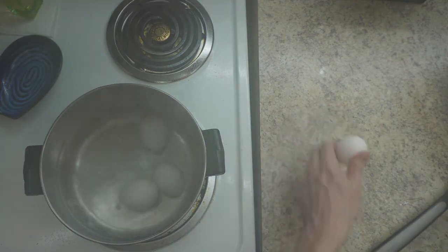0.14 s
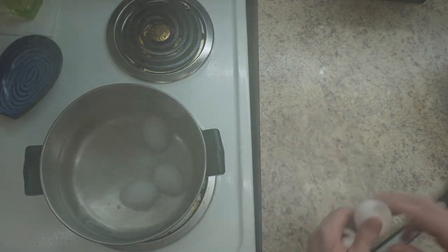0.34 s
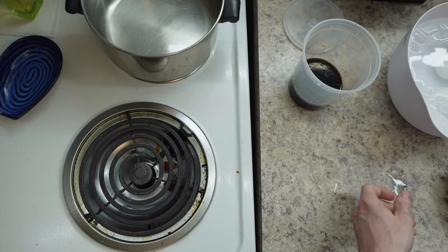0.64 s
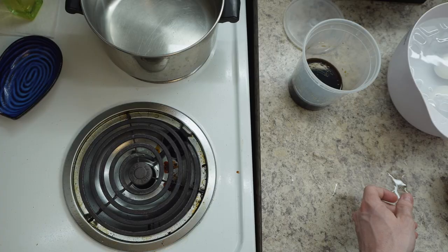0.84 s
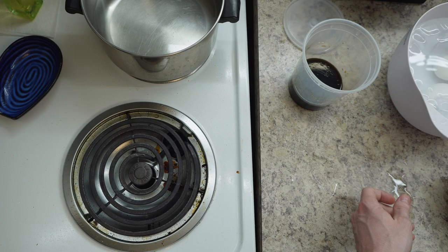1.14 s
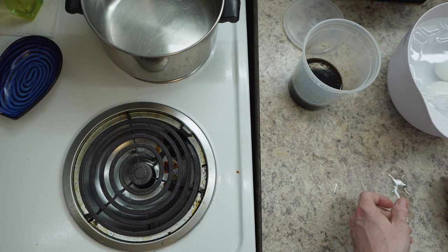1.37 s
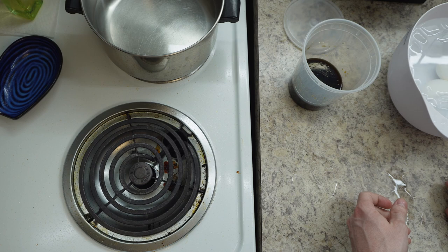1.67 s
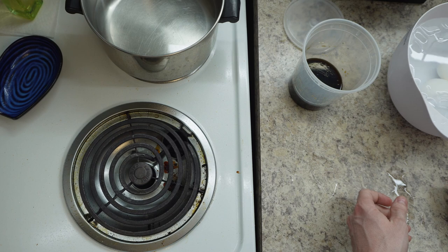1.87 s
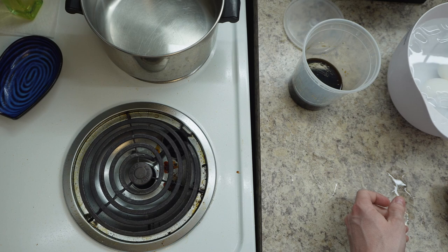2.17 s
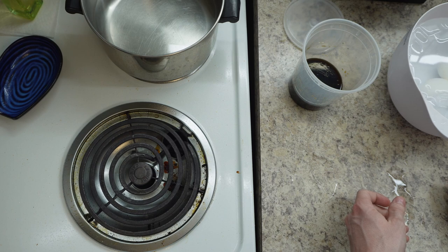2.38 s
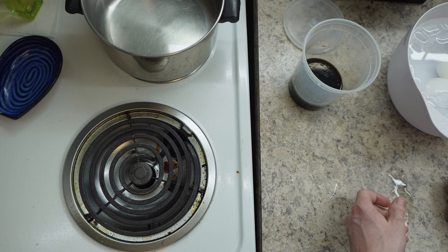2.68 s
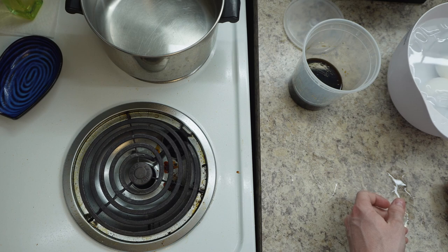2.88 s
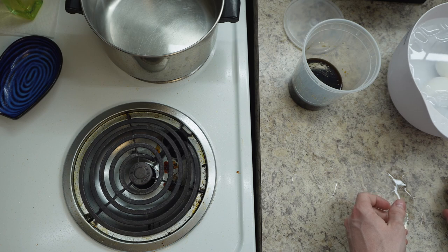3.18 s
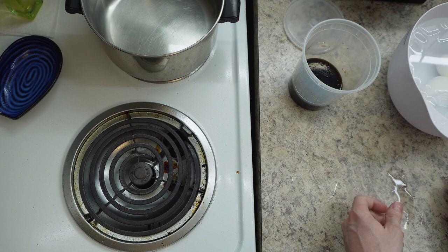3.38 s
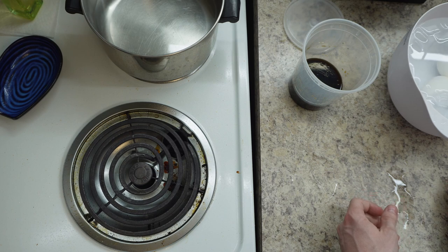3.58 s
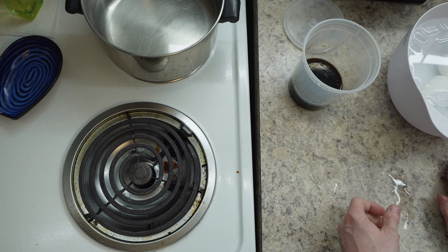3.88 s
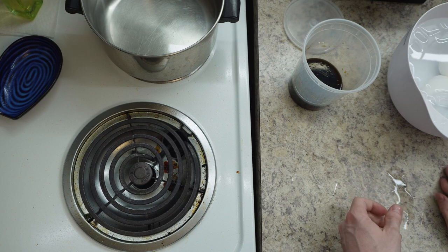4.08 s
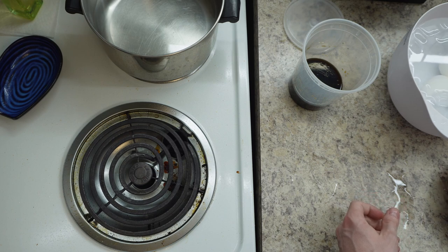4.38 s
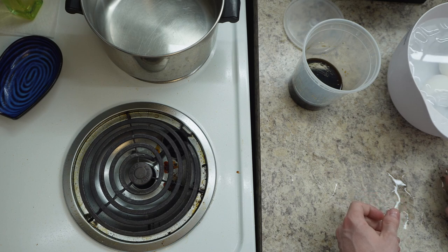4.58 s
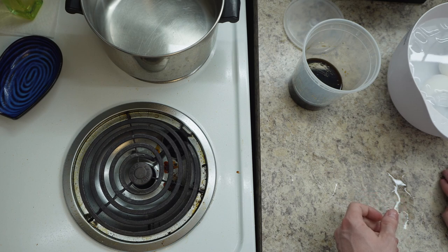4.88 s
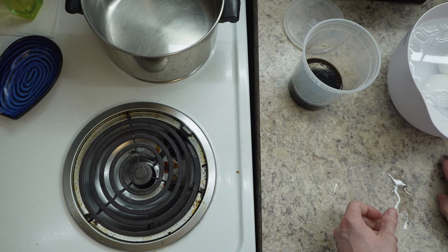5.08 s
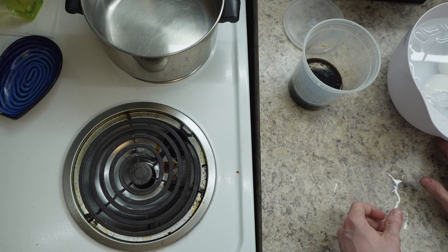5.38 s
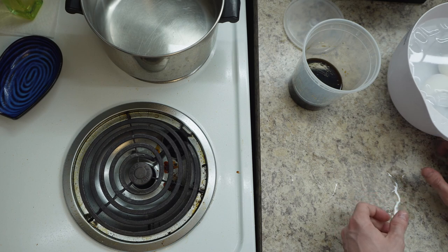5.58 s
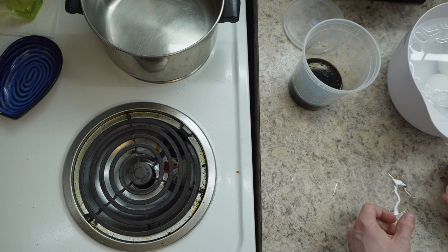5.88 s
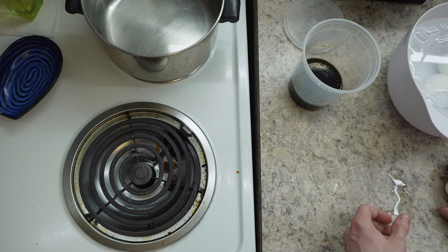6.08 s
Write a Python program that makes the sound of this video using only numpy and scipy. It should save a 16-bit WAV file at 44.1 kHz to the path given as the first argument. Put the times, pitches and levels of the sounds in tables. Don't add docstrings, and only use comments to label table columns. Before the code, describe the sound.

At the very start, an egg knocks the stone counter once, a soft click with a low woody ring and a small rumble, under sagging low room noise, a puff of steam hiss and a faint thin whistle. At about 0.65 seconds this cuts to quiet, steady fan hum. A blunt knock with a spray of splitting shell lands near 1.5, a very bright, short crack at 2.25, a softer knock that rings the stove at 2.7, and another crunchy tap at 2.9. From 3.15 to 3.5 the egg rolls, bumping and scraping grit, ending in a dry flick. Three quick taps follow at 4.5, 4.7 and 4.9, the last with a tiny rebound and flake tick. Faint ticks lead to a brief crackling squeeze around 5.5 to 5.7; then only fan air. The small hard room gives short, dense echoes to the close, dry blows.

```python
import sys
import numpy as np
from scipy import signal
from scipy.fft import rfft, irfft
from scipy.io import wavfile

SR = 44100
rng = np.random.default_rng(int(sys.argv[2]) if len(sys.argv) > 2 else 0)


def materialize(psi):
    bounded = np.clip(np.atleast_2d(psi).T, -1, 1)
    quanta = np.round(bounded * 32767).astype(np.int16)
    wavfile.write(sys.argv[1], SR, quanta)


def ratio(d):
    e = np.asarray(d, float) / 20
    return 10 ** e


N = 275003
TIME = np.arange(N) / SR


def first_knock():
    # (t/s, strength/dB, sharpness/(dB per octave above 1 kHz))
    hits = [
        (0.0255, 1, 2),
    ]
    # (f/Hz, level/dB, t60/s)
    modes = [(246, 3.5, 0.17), (324, -10, 0.34), (516, -1.5, 0.44), (804, -35, 1.0), (970, -14, 0.42),
             (1150, -4, 0.23), (1497, -38, 0.2), (2090, -17, 0.24), (2700, -12.5, 0.1), (400, 6.0, 0.075),
             (660, -18.0, 0.13), (202, 6.5, 0.28), (107, 2, 0.1), (1030, -4, 0.13)]
    # (f/Hz, level/dB)
    colour = [(300, -28.5), (600, -25), (1000, -29), (2700, -34.5), (4000, -46), (12000, -59.5)]
    return ratio(-6) * blows(hits, colour, modes, direct_db=-2, split_db=-9.5, split_s=0.0083)


def dull_knock():
    # (t/s, strength/dB, sharpness/(dB per octave above 1 kHz))
    hits = [
        (1.4676, 0, 0),
    ]
    # (f/Hz, level/dB, t60/s)
    modes = [(262.8, -2, 0.073), (405.0, 7, 0.092), (510, -1, 0.059), (687.0, -7.0, 0.3),
             (1250, -35, 0.176), (1460, -8, 1.0), (3090, -9, 0.04), (3460, -45, 0.026), (730, -1.5, .2),
             (570, -20, 0.084), (861, -1, .2), (862, -5.5, .15), (5900, -30, 0.024), (11100, 1, 0.035)]
    # (f/Hz, level/dB)
    colour = [(300, -17.5), (600, -12), (1100, -15), (3000, -16.5), (6000, -19.5), (7500, -32),
              (13000, -38)]
    return ratio(-1.5) * blows(hits, colour, modes, direct_db=8.5, split_db=-11.5, split_s=0.02)


def sharp_knock():
    # (t/s, strength/dB, sharpness/(dB per octave above 1 kHz))
    hits = [
        (2.2556, -1, 0.002),
    ]
    # (f/Hz, level/dB, t60/s)
    modes = [(292.7, 6.5, 0.27), (511, -8, 0.13), (662, -12.0, 0.1), (779.8, -4, 0.17),
             (1136.0, -3.5, 0.15), (1447, -2, 0.64), (1625, -1, 0.065), (3034, -3.5, 0.12),
             (3667, 6.5, 0.073), (380, -0.5, 0.16), (1014, -4.0, .2), (200, 2.5, 0.59), (121, -9.5, 0.31),
             (5850, 1.0, .1)]
    # (f/Hz, level/dB)
    colour = [(300, -29.5), (1000, -15.5), (3000, -19.5), (6000, -16), (12000, -33.5)]
    return ratio(-3) * blows(hits, colour, modes, direct_db=9.0, split_db=5.5, split_s=0.0022, give_s=0.00038)


def fourth_knock():
    # (t/s, strength/dB, sharpness/(dB per octave above 1 kHz))
    hits = [
        (2.6834, 0, 0.0049),
    ]
    # (f/Hz, level/dB, t60/s)
    modes = [(195, -5, 0.17), (357, -4, 0.4), (505, 0, 0.24), (537, 0.5, 0.36), (705, -15, 0.071),
             (1020, -19, 0.14), (1200, 3.0, 0.17), (2956, 3, 0.21), (3410, -20, 0.18), (3560, 2.5, 0.16),
             (400, 5, 0.11), (5370, 8.5, 0.032), (8770, 7, 0.035)]
    # (f/Hz, level/dB)
    colour = [(300, -23), (1000, -25), (3000, -31.5), (6000, -36.5), (12000, -54)]
    return ratio(-5) * blows(hits, colour, modes, direct_db=-4, split_db=-5, split_s=0.015, stove_db=2.0)


def last_taps():
    # (t/s, strength/dB, sharpness/(dB per octave above 1 kHz))
    hits = [
        (2.922, -2, 0.42),
        (4.4957, -1.5, 0.4),
        (4.692, -3.5, 1.8),
        (4.876, -2.7, 4.5),
        (4.884, -10, 3.5),
    ]
    # (f/Hz, level/dB, t60/s)
    modes = [(196.3, 6.5, 0.23), (322.0, 13.5, 0.045), (496, 4.5, 0.11), (801.0, 0, 0.3),
             (1040, 0.0, 0.077), (1195.3, 6, 0.05), (1537, -1.0, 0.043), (1748, 2.0, 0.045),
             (2083, -5.0, 0.19), (3335, -3.0, 0.055), (437, 9.5, 0.033), (400, 4.0, 0.12),
             (131.0, -2, 0.21), (5110, -7, 0.12)]
    # (f/Hz, level/dB)
    colour = [(300, -28.5), (1000, -24.5), (2100, -24.5), (3400, -26), (4500, -33.5), (6000, -32),
              (12000, -44.5)]
    return ratio(-0.5) * blows(hits, colour, modes, direct_db=7.0, split_db=-0.5, split_s=0.011, stove_db=9.5)


def blows(hits, colour, modes, direct_db, split_db, split_s, stove_db=-60, give_s=.0023):
    out = np.zeros((2, N))
    phases = np.pi + 1.03 * rng.standard_normal(len(modes))
    for s, strength_db, sharp_db in hits:
        body = 0
        for (hz, db, t60), phase in zip(modes, phases):
            level_miss, pitch_miss = rng.standard_normal(2)
            damped_t60 = min(t60 / 2, 36 / hz + .03)
            body = body + ratio(db + 2.5 * level_miss) * ring(hz * (1 + .006 * pitch_miss), damped_t60, phase)
        body += ratio(stove_db - 15) * ring(307, 0.401)
        age = np.arange(len(body)) / SR
        body *= 1 - np.exp(-age / .0012)

        far = body * np.exp(-age / .0007)
        split_sum = ratio(split_db) * np.sqrt(SR / (1 / split_s + 1 / .006))
        far[0] -= np.hypot(ratio(direct_db), split_sum)

        splitting = rng.laplace(size=len(body)) * np.exp(-age / split_s)
        body += ratio(split_db) * splitting * np.minimum(age / 0.00064, 1)
        body[0] -= ratio(direct_db - 4.5)
        body[int(give_s * SR)] -= ratio(direct_db)

        tone = []
        for hz, db in colour:
            octaves = max(np.log2(hz / 1000), 0)
            tone.append((hz, db + strength_db + sharp_db * octaves))
        bottom = [(20, tone[0][1] - 36), (70, tone[0][1] - 14)]
        contact = click(bottom + tone + [(16000, tone[-1][1] - 11)])
        add(out[0], s + .0017, signal.fftconvolve(body, contact))
        add(out[1], s + .0017, signal.fftconvolve(far, contact))
    return out


def squeeze():
    # (t/s, splinter level/dB, hollow level over it/dB)
    splits = [(5.52, -70, -9), (5.54, -68, 4), (5.5875, -57, -8), (5.5975, -49, -22), (5.6018, -42, 0),
              (5.612, -58, -7), (5.6225, -46.5, -24), (5.638, -45.5, -8), (5.646, -56, -16),
              (5.6631, -43.5, 0.5), (5.668, -58, 9)]
    out, t = np.zeros(N), TIME[:2000]
    for s, db, hollow_db in splits:
        burst = rng.laplace(size=len(t)) * np.exp(-t / 0.0047)
        hollow = ratio(hollow_db + 14.5) * band(band(burst, 840, 1200), 750, 1600)
        middle = ratio(9.0) * band(band(burst, 1640, 2020), 3300, 3100)
        splinters = ratio(2.0) * band(band(burst, 5300, 6600), 6400, 8000)
        add(out, s, ratio(db) * (hollow + middle + splinters))
    rustle = unit(band(grains(5000, 2.8), 6000, 8000))
    touch = swell(5.532, -62, rise_s=.023, fall_s=.077)
    full = swell(5.6, -50.5, rise_s=0.015, fall_s=0.042, hold_s=0.079)
    return out + ratio(-10) * (touch + full) * rustle


def roll():
    # (t of greatest pressure/s, rumble level/dB, grit level/dB, 20 dB rise/s, 20 dB fall/s)
    rocks = [
        (0.003, -39.5, -60, 0.054, 0.069),
        (0.028, -31.5, -60, 0.0093, 0.024),
        (1.744, -54, -81, .024, 0.077),
        (3.165, -62, -77, .05, .06),
        (3.23, -68, -68, .06, .06),
        (3.278, -61, -56.5, 0.028, 0.037),
        (3.418, -46.5, -59, 0.072, 0.028),
    ]
    # (t/s, level/dB, f/Hz, t60/s)
    bumps = [(1.744, -50, 260, 0.071), (2.262, -42, 202, 0.11), (2.69, -68, 150, 0.099),
             (4.7, -41, 200, 0.072), (4.885, -35.5, 200, 0.077), (2.27, -49.5, 76.5, 0.17),
             (3.153, -50, 430, .04), (3.165, -56, 400, 0.1), (3.225, -54.5, 380, 0.073),
             (3.273, -41, 385, 0.044), (3.287, -59.5, 377, 0.023), (3.404, -54, 790, 0.053),
             (3.408, -41, 318, 0.035), (3.422, -46, 365, 0.046), (3.433, -41, 400, 0.019),
             (3.465, -55, 300, 0.26), (3.481, -57, 325, 0.037), (4.7, -66, 70, 0.54)]
    rumble = unit(drum(grains(270, 2.0)))
    grit = grains(4000, 2.5)
    scrape = unit(band(band(grit, 3000, 5000), 4200, 6000) + 0.52 * band(grit, 5000, 500))
    rocking = np.zeros(N)
    for s, db, grit_db, rise_s, fall_s in rocks:
        rubbing = ratio(db - 7.0) * rumble + ratio(grit_db - 11) * scrape
        rocking += swell(s, 0, rise_s, fall_s) * rubbing
    return rocking + ratio(3.5) * pings(bumps, grit=0.13)


def drum(x):
    # (f/Hz, width/Hz, level/dB)
    modes = [(260, 61, 2.5), (384.7, 110, 3), (460, 240, -18), (743, 140, -7.5), (1305, 210, -13.5)]
    return sum(ratio(db) * band(band(x, hz, w), hz, 2 * w) for hz, w, db in modes)


def ticks():
    # (t/s, level/dB, f/Hz)
    flakes = [(.17, -64, 10200), (0.185, -63, 3540), (.236, -69, 4830), (.357, -66, 10500),
              (.44, -68, 5050), (0.899, -71, 3080), (1.061, -71, 8200), (1.902, -73, 9000),
              (3.781, -71.5, 6000), (4.21, -70, 8080), (4.832, -69, 13500), (4.946, -39, 6000),
              (5.123, -60, 8340), (5.297, -59, 3670)]
    # (t/s, level/dB, f/Hz, t60/s)
    snaps = [
        (.720, -53, 1490, 0.045),
        (.721, -60, 2900, .03),
        (1.060, -61, 1588, 0.04),
        (1.061, -58.5, 2700, .03),
        (1.4775, -41.5, 5900, 0.012),
        (1.830, -54, 1450, 0.045),
        (2.2577, -5.5, 5680, 0.0054),
    ]
    flick = ratio(-3.5) * (np.arange(N) == int(3.486 * SR))
    flick = band(band(flick, 10200, 1300) + ratio(-31) * flick, 11200, 5400)
    small = pings([(*row, 0.012) for row in flakes], grit=5)
    return flick + pings(snaps, grit=.05) + ratio(-6) * small


def kitchen(x, wet_db, far=None, early_db=-6, early_s=0.024, gap_s=0.0015):
    # (f/Hz, t60/s, level/dB)
    decay = [(150, 0.34, -6), (300, 0.15, -39), (595, 0.33, -5.5), (1180, 0.64, -20), (2600, 0.32, -19.5),
             (5030, 0.2, -34.5), (8700, 0.39, -20.5), (15000, 0.065, -15.5)]
    # (f/Hz, level/dB)
    wall_colour = [(300, 0.5), (1600, 3), (2400, -3), (3500, 0), (4500, -2), (6300, 3), (7000, 0),
                   (9000, 1)]
    t, noise = TIME[:SR], rng.standard_normal(SR)
    early = ratio(early_db) * np.exp(-t / early_s)
    tail = sum(ratio(db) * band(noise, hz, hz) * (1000. ** (-t / t60) + early) for hz, t60, db in decay)
    echo = np.convolve(tail * (t > gap_s), click(wall_colour, size=512))
    sent = x if far is None else far
    return x + ratio(wet_db) * signal.fftconvolve(sent, echo)[:N]


def air():
    cut_s, start_s = .645, 0.01
    before = steamy_air() * (TIME > start_s) * (TIME < cut_s)
    return before + fan_air() * np.clip((TIME - cut_s) / 0.0066, 0, 1)


def steamy_air():
    # (f/Hz, level/dB per Hz)
    spectrum = [(15, -45), (25, -2), (240, -4), (274, -4.5), (359, -1.5), (631, -8.5), (741, -6.5),
                (2360, -26), (3630, -29), (15500, -37)]
    noise = coloured(spectrum)
    low = signal.lfilter(*signal.butter(2, 2500, fs=SR), noise)
    sag = ratio(14.0 - 75 - 28 * TIME)
    hiss = ratio(-77.5) + swell(.194, -71.5 - 3.5, rise_s=0.045, fall_s=0.59)
    whistle = swell(.19, -78, rise_s=0.023, fall_s=.07, hold_s=0.26)
    whistle = whistle * unit(band(rng.standard_normal(N), 3630, 260))
    return sag * unit(low) + ratio(7.0) * hiss * unit(noise - low) + ratio(3.0) * whistle


def fan_air():
    # (f/Hz, level/dB per Hz)
    spectrum = [(15, -40), (25, -8), (53, -12.5), (101, 0), (160, -13), (198, -6), (349, -7), (495, -13),
                (598, -12.5), (1240, -18.5), (1380, -20.5), (1710, -23.5), (2010, -23.5), (2920, -25),
                (15500, -47)]
    # (f/Hz, width/Hz, level/dB)
    hums = [(102, 55, -71.5), (487.4, 30, -72), (683, 33, -76.5), (1058, 72, -75), (1237, 57, -71.5),
            (1665, 57, -76), (2940, 61, -86.5)]
    fan = sum(ratio(db) * unit(band(rng.standard_normal(N), hz, w)) for hz, w, db in hums)
    return ratio(-60 - 4.0) * coloured(spectrum) + fan


def grains(rate, spread_db):
    hit = rng.random(N) < rate / SR
    return hit * ratio(spread_db * rng.exponential(size=N)) * rng.choice([-1, 1], N)


def pings(table, grit):
    out, t = np.zeros(N), TIME[:SR // 2]
    for s, db, hz, t60 in table:
        splinter = grit * band(rng.standard_normal(len(t)), hz, hz) * 1000. ** (-t / t60)
        mode = ring(hz, t60, size=len(t)) * (1 - np.exp(-t * hz / 0.5))
        add(out, s, ratio(db) * (mode + splinter))
    return out


def ring(hz, t60, phase=0, size=22050):
    t = np.arange(size) / SR
    return np.sin(2 * np.pi * hz * t + phase) * 1000. ** (-t / t60)


def swell(s, db, rise_s, fall_s, hold_s=0):
    distance = np.maximum((s - TIME) / rise_s, (TIME - s - hold_s) / fall_s)
    return ratio(db - 20 * np.maximum(distance, 0))


def band(x, hz, width_hz):
    return signal.lfilter(*signal.iirpeak(hz, hz / width_hz, fs=SR), x)


def tint(points, size):
    hz, db = np.transpose(points)
    bins_hz = np.arange(size // 2 + 1) * SR / size
    return ratio(np.interp(np.log(bins_hz + 1), np.log(hz), db))


def coloured(points):
    white = rfft(rng.standard_normal(N + 1), N + 1)
    return unit(irfft(white * tint(points, size=N + 1))[:N])


def click(points, size=2048):
    cepstrum = irfft(np.log(tint(points, size=size)))
    cepstrum[1:size // 2] *= 2
    cepstrum[size // 2 + 1:] = 0
    return irfft(np.exp(rfft(cepstrum)))


def unit(x):
    return x / np.sqrt(np.mean(x ** 2))


def add(out, s, x):
    i = int(s * SR)
    out[i:i + len(x)] += x[:len(out) - i]


def scene():
    groups = [(first_knock() + dull_knock(), -13), (sharp_knock(), -12),
              (fourth_knock(), -10), (last_taps(), -16)]
    knocks = sum(kitchen(near, wet_db, far) for (near, far), wet_db in groups)
    crunch = kitchen(squeeze(), wet_db=-28)
    small = kitchen(ticks(), wet_db=-34.5) + kitchen(roll(), wet_db=-25.5)
    return (knocks + crunch + small + air())[None]


def roll_off(x):
    return signal.sosfilt(signal.butter(12, 16820, fs=SR, output="sos"), x)


def record(dry):
    top_cut = signal.ellip(5, .3, 24, 15600, fs=SR, output="sos")
    mix = signal.sosfilt(top_cut, dry)
    return roll_off(mix)


dry = scene()
out = record(dry)
materialize(out)
```